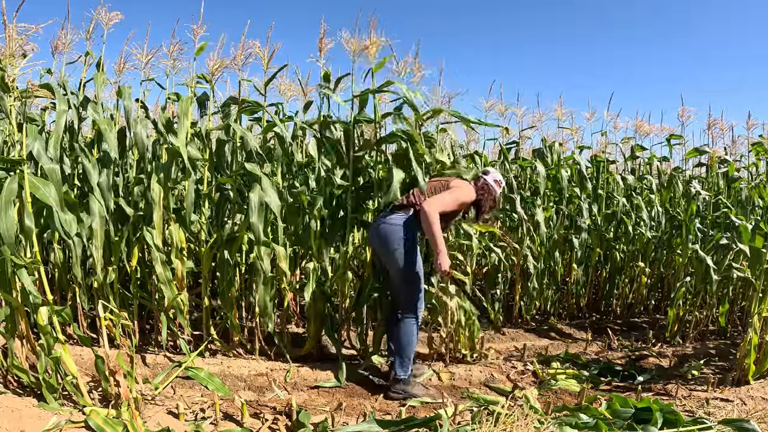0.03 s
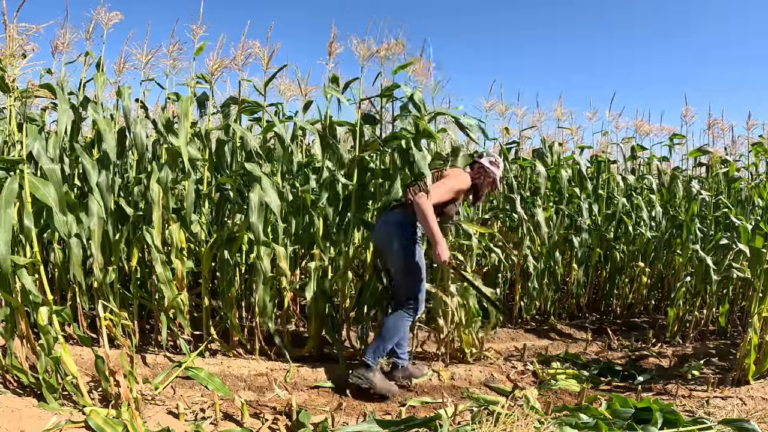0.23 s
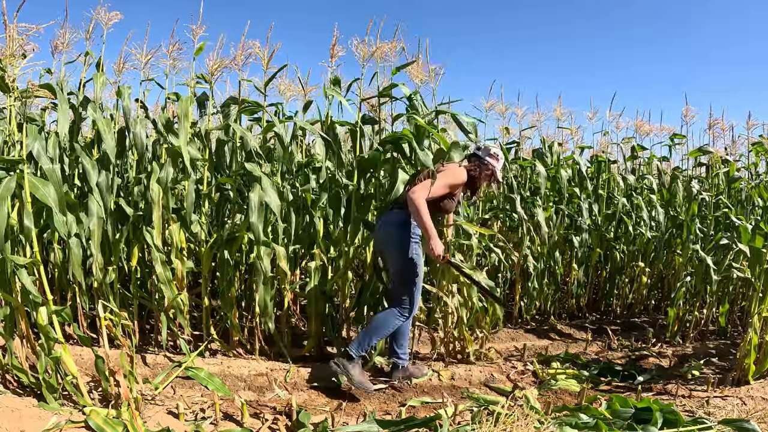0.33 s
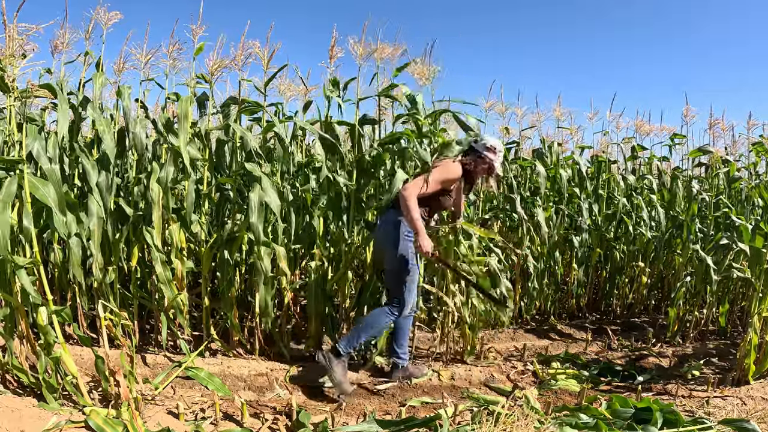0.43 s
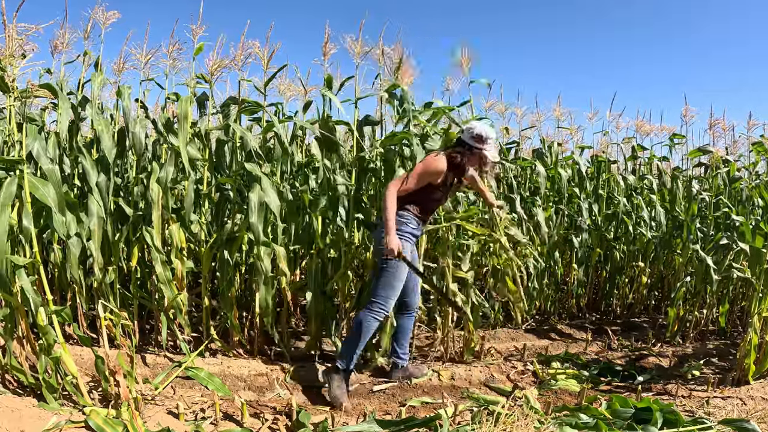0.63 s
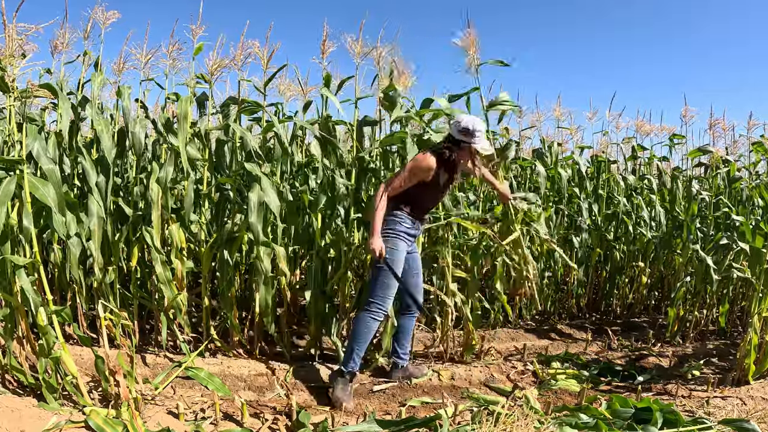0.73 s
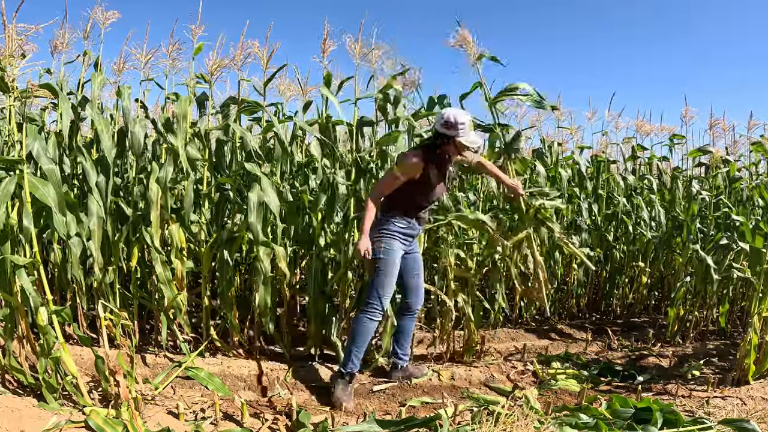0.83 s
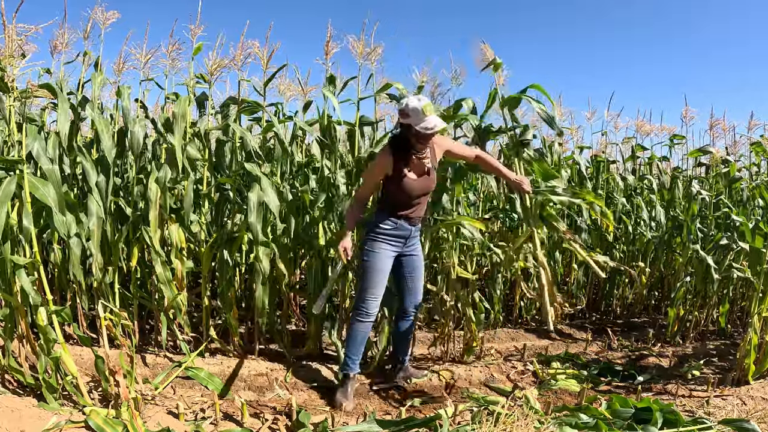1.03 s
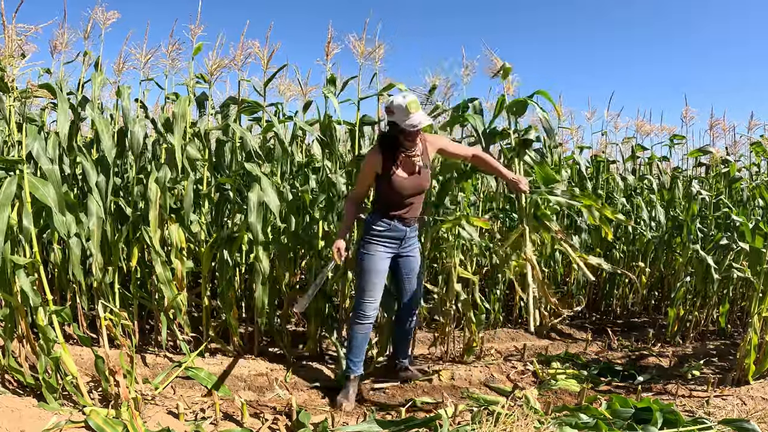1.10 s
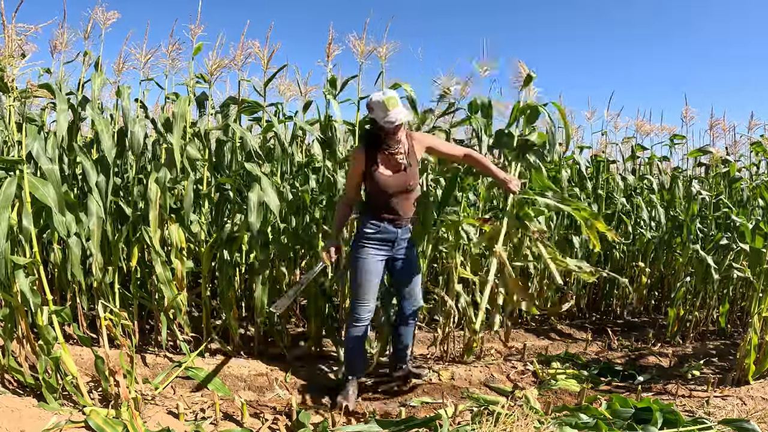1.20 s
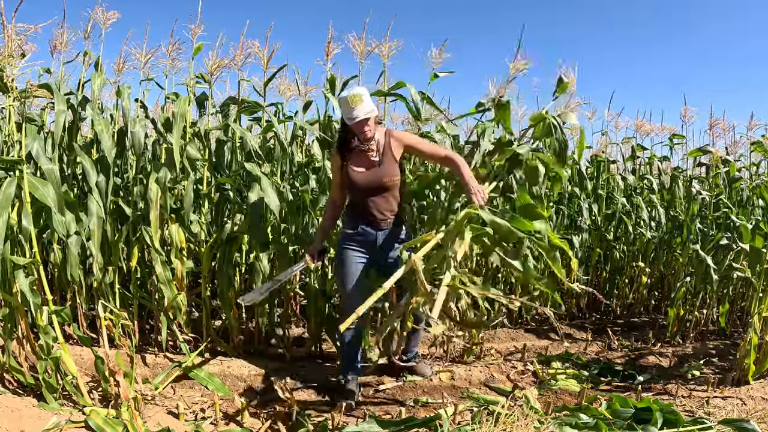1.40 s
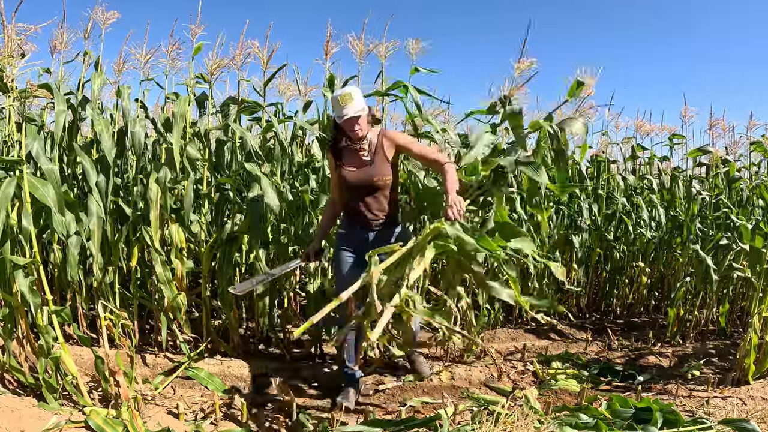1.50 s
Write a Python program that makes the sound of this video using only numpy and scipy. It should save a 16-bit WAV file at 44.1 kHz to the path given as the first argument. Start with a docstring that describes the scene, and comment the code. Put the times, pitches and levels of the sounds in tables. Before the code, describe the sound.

Dry corn stalks rustle and snap as they are pulled, with wind on the microphone.

```python
"""Corn stalks dragged out of the row and swung aside, a few metres from a phone in an open field.
From the start dry leaves scrape in dense tiny ticks, over a breeze rumbling on the microphone.
Blades swish past each other and ribs snap, loudest near 0.23 s. From 0.35 to 0.6 s a gust buffets
mainly the right port. Near 0.8 s the stalks clear the row and the rustle, quieter now, moves to
the centre; soft steps on loose soil and two more snaps follow."""
import sys
import numpy as np
from scipy import signal
from scipy.fft import rfft, irfft, next_fast_len
from scipy.io import wavfile
from scipy.ndimage import uniform_filter1d

SR = 44100
rng = np.random.default_rng(int(sys.argv[2]) if len(sys.argv) > 2 else 0)


def bounce(signal):
    """Save signal as a 16-bit WAV file at the path given by the first command-line argument."""
    frames = np.transpose(np.atleast_2d(signal))
    limited = np.clip(frames, -1, 1)
    pcm = np.round(limited * 32767).astype(np.int16)
    wavfile.write(sys.argv[1], SR, pcm)


N = 68355
t = np.arange(N) / SR


def undb(db):
    """Decibels to gain."""
    return 10 ** (np.asarray(db) / 20)


def unit(x):
    """Scale to rms 1."""
    return x / np.sqrt(np.mean(x ** 2) + 1e-18)


def curve(rows):
    """Join (time, value) rows by straight lines."""
    return np.interp(t, *np.array(rows, float).T)


def swell(at, rise_s, fall_s):
    """A bell curve with its own width on each side of the peak."""
    return np.exp(-((t - at) / np.where(t < at, rise_s, fall_s)) ** 2 / 2)


def shape(x, gain):
    """Filter by a gain that is a function of frequency."""
    size = next_fast_len(N + 8192)
    hz = np.maximum(np.arange(size // 2 + 1) * SR / size, 1)
    return irfft(rfft(x, size) * gain(hz), size)[..., :N]


def colour(x, points):
    """Filter by (Hz, dB) points, keeping the power of white noise."""
    hz, db = np.array(points, float).T
    return shape(x, lambda f: unit(undb(np.interp(np.log(f), np.log(hz), db))))


def drift(rate_hz):
    """Smooth random drift, rms 1."""
    hold = int(SR / rate_hz)
    stairs = np.repeat(rng.standard_normal(N // hold + 1), hold)
    return unit(uniform_filter1d(uniform_filter1d(stairs, hold), hold)[:N])


def steady(x, span_s):
    """Even out the slow swells of a noise; rms near 1."""
    return x / np.sqrt(uniform_filter1d(x ** 2, int(span_s * SR)) + 1e-12)


def ticks(per_s, spread_db):
    """Random tiny fractures: many weak, a few strong."""
    hits = (rng.random(N) < per_s / SR) * np.sign(rng.standard_normal(N))
    return unit(hits * undb(spread_db * np.minimum(rng.exponential(size=N), 5)))


# Spectrum of leaves far off in the field: f/Hz, relative level/dB
FIELD_COLOUR = [(200,-1),(600,-1),(1400,2),(3300,7),(6000,-3.5),(9000,-27),(13000,-9),(15500,-18)]
def field():
    """In the distance the rest of the field hisses faintly in the breeze."""
    return colour(rng.standard_normal(N), FIELD_COLOUR) * undb(-64.5)


# Spectrum of the breeze on the microphone: f/Hz, relative level/dB
BREEZE_COLOUR = [(12,-1.5),(25,-1),(55,0.5),(85,4),(125,-1),(160,-12.5),(230,-21),(350,-31.5),(600,-43),(1200,-67),(3000,-76)]
def breeze(level_db=-37, side_db=-23.5, fade_db_per_s=4):
    """Low wind rumble on the microphone, slowly fading, nearly alike on both sides."""
    mid, side = (steady(colour(rng.standard_normal(N), BREEZE_COLOUR), 0.062) for _ in range(2))
    rumble = mid + undb(side_db) * np.array([side, -side])
    return rumble * undb(level_db - fade_db_per_s * t)


# Soft footfalls: t/s, level/dB, centre f/Hz
STEPS = [(.928,-55,227),(1.021,-54.5,270),(1.272,-55,198),(1.511,-48.5,186),(1.533,-46.5,195)]
def steps():
    """Boots press into loose soil with a dull bump."""
    out = np.zeros(N)
    for at, db, hz in STEPS:
        soil = shape(rng.standard_normal(N), lambda f: 1 / (1 + (f / hz - hz / f) ** 4))
        out += steady(soil, 0.031) * undb(db) * swell(at, rise_s=0.0073, fall_s=0.021)
    return out


# Eddies striking the right port: t/s, peak level/dB, half width/s
POPS = [(.356,-4,0.00097),(.3805,-15.5,0.00036),(0.3866,-6,.00036),(.393,-8,.0006),(0.411,-5,0.00039),(0.4192,-20.5,.0003),(0.4266,-15,0.00086),(.4402,-9,0.00043),(0.4584,-14,0.00031),(.4703,-9,0.00049),(.497,-16.5,0.001),(.518,-13,0.00051),(.534,-16,0.00096)]
def pops():
    """Each eddy gives a brief suction at the port, with a rebound before and after."""
    out = np.zeros(N)
    for at, db, width in POPS:
        offset = (t - at) / width
        out -= undb(db) * (1 - offset ** 2) * np.exp(-offset ** 2 / 2)
    return out


# Wind at the right port: t/s, relative level/dB
GUST_LEVEL = [(0,-34.5),(.19,-38.5),(.21,-20),(.245,-55),(.272,-41),(.285,-20.5),(.315,-18.5),(.338,-37),(.354,-9),(.425,-11),(.48,-17),(.515,-12.5),(.55,-18),(.59,-29.5),(.63,-40),(.66,-46),(1.55,-57)]
# Spectrum of the turbulence: f/Hz, relative level/dB
GUST_COLOUR = [(12,-34),(25,3),(55,-1),(140,2.5),(250,-2),(450,-9),(800,-14.5),(1100,-22.5),(1500,-55),(2500,-80)]
# Its upper edge, set by eddy size: t/s, f/Hz
GUST_EDGE = [(0,74),(.17,95),(.21,131),(.27,120),(.335,161),(.356,445),(.385,650),(.46,734),(.53,674),(.565,433),(.62,161),(1.55,149)]
def gust(left_bass_hz=155):
    """Turbulence on the right port, reaching higher as the eddies shrink; the left gets its bass."""
    turbulence = colour(rng.standard_normal(N), GUST_COLOUR)
    edge_octave, level_db = np.log2(curve(GUST_EDGE)), curve(GUST_LEVEL)
    flow = np.zeros(N)
    for octave in range(5, 12):  # crossfade low-passes an octave apart
        weight = np.maximum(1 - abs(edge_octave - octave), 0)
        flow += weight * shape(turbulence, lambda f: 1 / np.sqrt(1 + (f / 2 ** octave) ** 7))
    right = steady(flow, 0.027) * undb(level_db - 4) + pops()
    left_spill = shape(right, lambda f: undb(-7) / np.hypot(1, f / left_bass_hz) + undb(-22.5))
    left_rumble = colour(rng.standard_normal(N), BREEZE_COLOUR) * undb(level_db - 23)
    return np.array([left_spill + left_rumble, right])


# Blades passing each other: peak t/s, level/dB, rise/s, fall/s
SWISHES = [(.166,-34,.002,0.0041),(.335,-46,0.018,0.02),(.823,-63.5,0.0073,0.011),(.90,-64,0.0066,0.034),(1.035,-56.5,.01,0.017),(1.074,-55,0.018,0.011),(1.224,-60,0.0049,.01),(1.403,-62.5,.003,0.048)]
# Spectrum of a swish: f/Hz, relative level/dB
SWISH_COLOUR = [(200,-7),(600,0),(1500,1.5),(3300,6.5),(5000,-2.5),(7200,-0.5),(8700,-9.5),(10500,-5.5),(15000,-21)]
def swishes():
    """A blade slides over another in a bright swell of ticks."""
    envelope = sum(undb(db) * swell(at, rise, fall) for at, db, rise, fall in SWISHES)
    return envelope * colour(ticks(per_s=14000, spread_db=3), SWISH_COLOUR)


# Ribs and stems breaking: t/s, level/dB, ring f/Hz, relative ring level/dB
SNAPS = [(0.1147,-45,1564,7),(0.1916,-43,3250,-14),(0.2225,-26,2930,-11.5),(0.232,-23.5,3360,-13),(.241,-41,2460,-1),(.4564,-57,1700,-5),(.597,-41,1940,-4.5),(0.6608,-47,1250,4),(.6982,-44,2890,-3),(1.085,-45.5,3300,-2),(1.529,-43.5,1400,-7)]
# Spectrum of a crack: f/Hz, relative level/dB
SNAP_COLOUR = [(200,-9),(800,-14),(1500,5.5),(3200,3),(4800,3),(7000,-17),(15000,-41)]
def snaps(crack_s=0.00089, tail_s=0.014, tail_db=-20, ring_s=0.002):
    """A rib breaks: a crack, a tail of tearing fibres and a short ring of the stalk."""
    cracks, rings = np.zeros(N), np.zeros(N)
    for at, db, hz, ring_db in SNAPS:
        age = np.maximum(t - at, 0)
        decay = np.exp(-age / crack_s) + undb(tail_db) * np.exp(-age / tail_s)
        cracks += (age > 0) * undb(db) * decay
        rings += 2 * undb(db + ring_db) * np.sin(2 * np.pi * hz * age) * np.exp(-age / ring_s)
    return colour(cracks * rng.standard_normal(N), SNAP_COLOUR) + rings


# How hard the leaves rub: t/s, relative level/dB
RUBBING = [(0,-46.5),(.06,-45.5),(.21,-43.5),(.235,-45),(.26,-43.5),(.375,-45),(.41,-49.5),(.46,-48),(.53,-50),(.67,-55.5),(.755,-50.5),(.80,-54),(.87,-56.5),(.92,-54.5),(1.0,-57),(1.07,-51.5),(1.14,-56),(1.3,-58.5),(1.51,-59),(1.532,-54),(1.55,-58)]
# Spectrum of the scrape: f/Hz, relative level/dB
LEAF_COLOUR = [(150,-30),(400,-31),(800,-16.5),(1400,-4),(2300,-1.5),(3400,0),(5200,-5.5),(7000,-9),(8600,-15.5),(10000,-15),(12500,-24.5),(15500,-46)]
# Stems knocking together: t/s, relative level/dB
KNOCKING = [(0,-50.5),(.23,-43.5),(.33,-53),(.6,-54),(.76,-52.5),(.85,-65.5),(1.07,-60.5),(1.5,-65),(1.535,-57)]
# Spectrum of the stems: f/Hz, relative level/dB
STEM_COLOUR = [(200,-16),(600,-7.5),(950,-8),(1400,-1),(2400,-9),(3200,-4.5),(5000,-15.5),(9000,-41.5)]
def leaves_and_stems(treble_hz=6600, treble_db_per_db=0.56):
    """Dry leaves scrape in dense ticks, brighter when rubbed harder; stems rattle lower."""
    effort_db = curve(RUBBING)
    scrape = colour(ticks(per_s=16000, spread_db=2.5), LEAF_COLOUR)
    treble = shape(scrape, lambda f: 1 / (1 + (treble_hz / f) ** 4))
    scrape += treble * (undb(treble_db_per_db * (effort_db - effort_db.mean())) - 1)
    rattle = colour(ticks(per_s=5000, spread_db=3), STEM_COLOUR)
    scrape *= undb(effort_db - 1 + drift(70.4))  # both flutter by about 1 dB
    rattle *= undb(curve(KNOCKING) - 0.5 + drift(48.2))
    return scrape + rattle


def corn():
    """The stalks in hand rub, swish and snap, a few metres from the microphone."""
    return leaves_and_stems() + swishes() + snaps()


def among_plants(direct, scattered, clear_at_s=0.77, clearing_s=0.18, row_db=-13.5, open_db=-29):
    """The row scatters the rustle sideways and sets it right; in the open it is narrow and central."""
    in_row = 0.5 - 0.5 * np.tanh((t - clear_at_s) / clearing_s)
    lag_s, lag_top_hz, wide_hz = 26e-6, 6000, 7100  # the left port hears it later; treble scatters more
    late = shape(direct, lambda f: np.exp(-2j * np.pi * f * lag_s / (1 + (f / lag_top_hz) ** 8)))
    side = shape(scattered, lambda f: np.hypot(1, f / wide_hz))
    side *= undb(open_db + in_row * (row_db - open_db))
    return np.array([direct + in_row * (late - direct) + side, direct - side])


def scene():
    """The corn and the steps in front, the field behind, the wind on the microphone."""
    return among_plants(corn(), corn()) + steps() + field() + gust() + breeze()


def record(dry):
    """The phone cuts the treble above 15.1 kHz."""
    return signal.sosfilt(signal.ellip(8, 0.2, 70, 15100, fs=SR, output="sos"), dry)


dry = scene()
out = record(dry)
bounce(out)
```